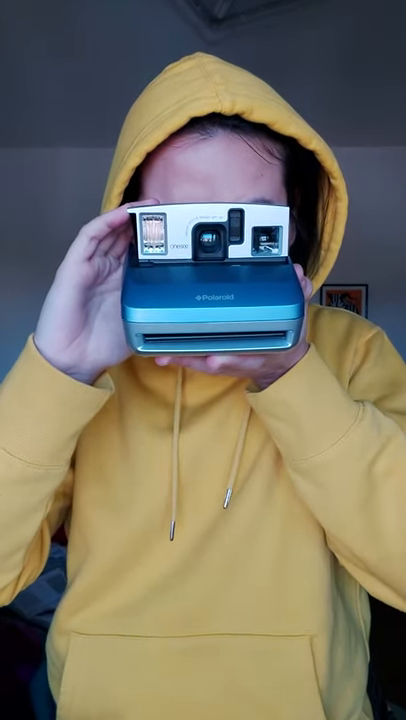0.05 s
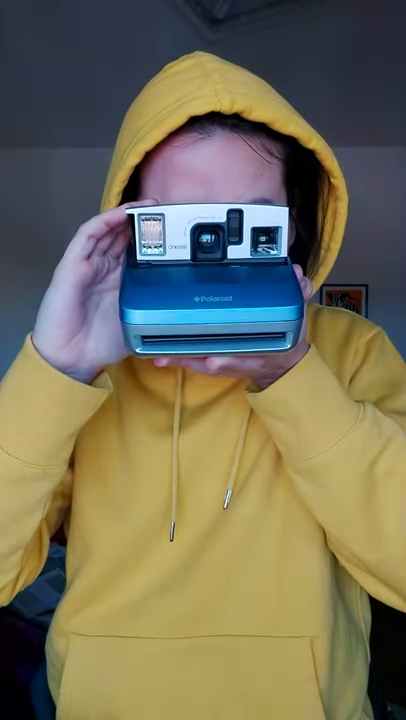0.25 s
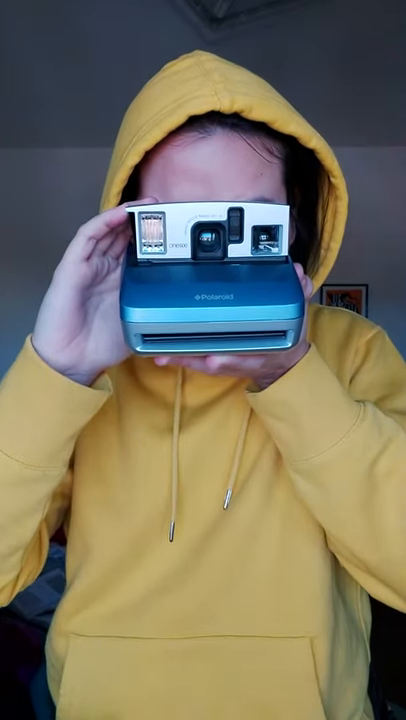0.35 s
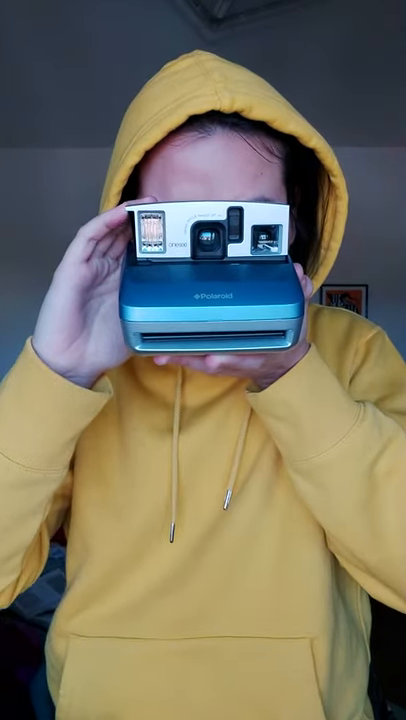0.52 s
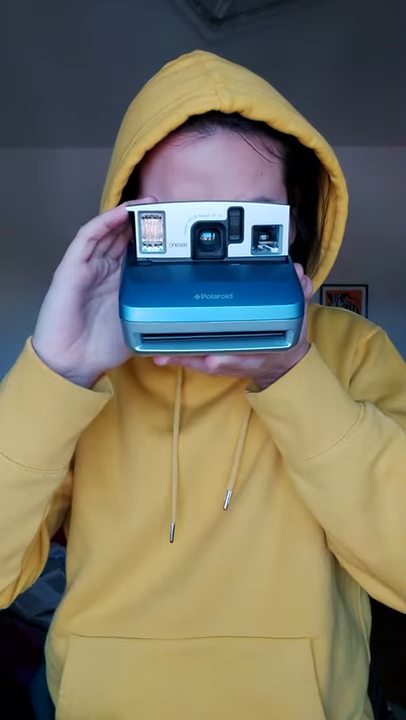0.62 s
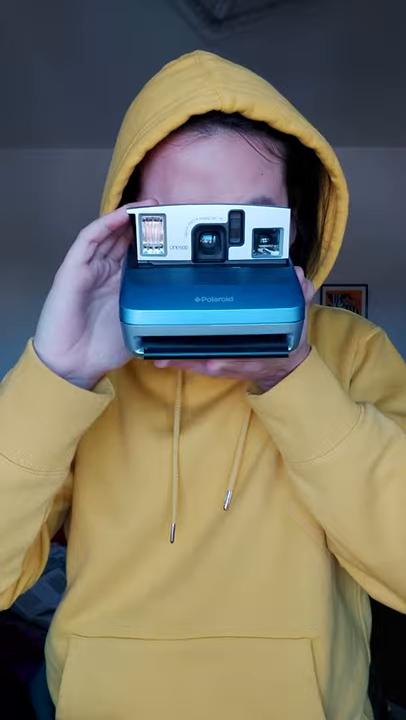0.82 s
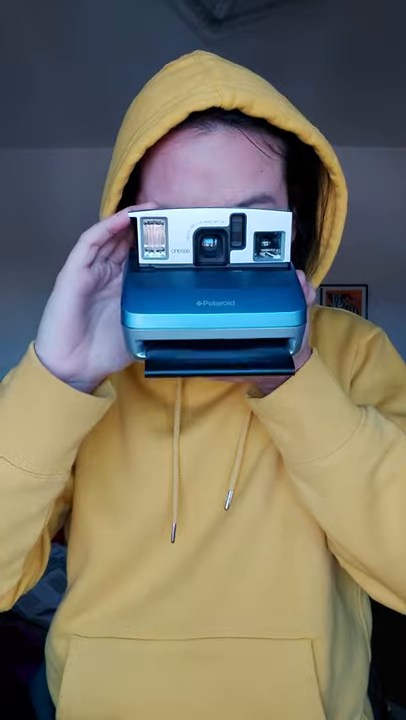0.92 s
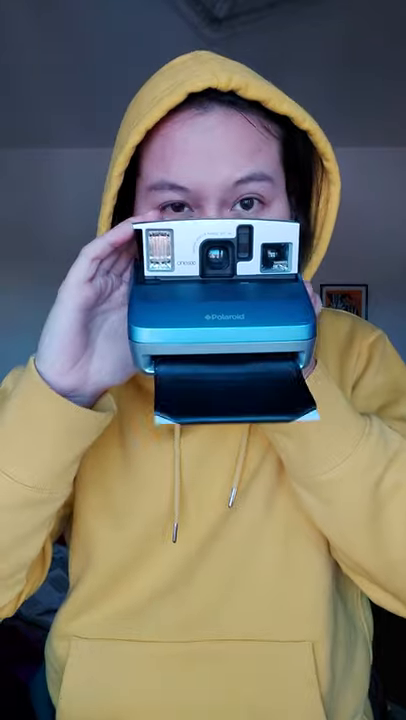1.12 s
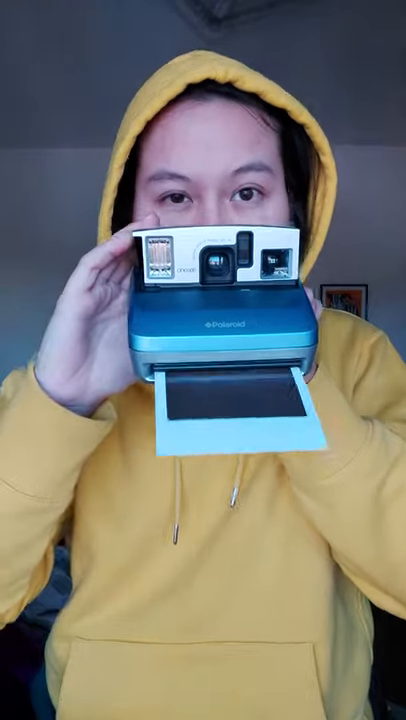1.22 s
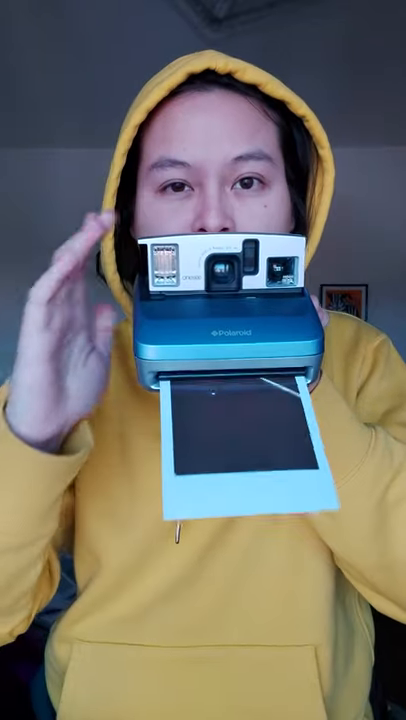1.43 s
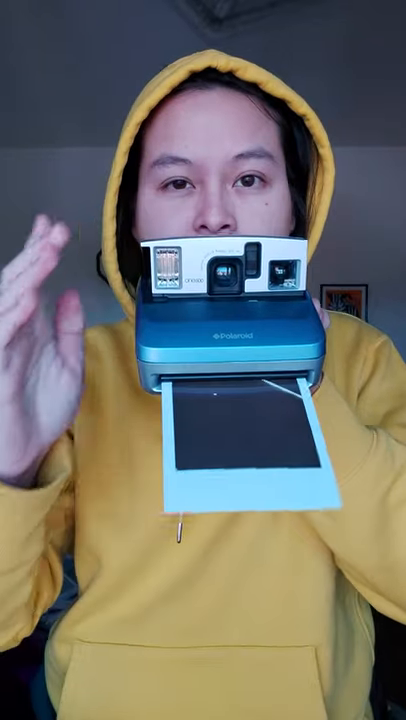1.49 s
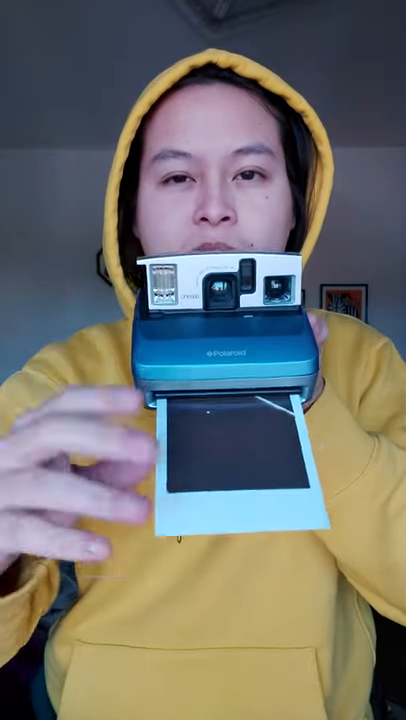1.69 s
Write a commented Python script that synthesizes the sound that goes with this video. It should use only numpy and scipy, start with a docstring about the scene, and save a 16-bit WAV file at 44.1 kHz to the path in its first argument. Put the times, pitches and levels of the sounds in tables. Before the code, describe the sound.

An instant camera clicks, then whirs and clacks as its motor pushes out a print.

```python
"""An instant camera takes a picture and pushes out the print in a small, quiet room.
First the button, shutter and mirror click. Then a small motor starts to whine and drives rattling
plastic gears. The rollers grip the print with a growl and hum as they squeeze it, slowing the motor.
Next levers clack, the light shield snaps back and rustles, and the freed print wobbles.
After a last clack the gears run down."""
import sys
import numpy as np
from scipy import signal
from scipy.fft import rfft, irfft
from scipy.io import wavfile

SR = 44100
rng = np.random.default_rng(int(sys.argv[2]) if len(sys.argv) > 2 else 0)


def to_wav(s):
    """Save 16-bit WAV."""
    ch = np.atleast_2d(s).T  # columns
    pcm = np.round(np.clip(ch, -1, 1) * 32767)  # PCM
    wavfile.write(sys.argv[1], SR, pcm.astype(np.int16))


N = 77175
TIME = np.arange(N) / SR
FFT_SIZE = 2 ** 17
HZ = np.maximum(np.arange(FFT_SIZE // 2 + 1) * SR / FFT_SIZE, 1)


def from_db(db):
    """Turn decibels into a number to multiply by."""
    return 10 ** (np.asarray(db) / 20)


def rms_one(x):
    """Scale to an average strength (rms) of 1."""
    return x / np.sqrt(np.mean(x ** 2) + 1e-20)


def in_time(rows):
    """Join a table's points in time: one curve for each column after the first."""
    times, *columns = np.transpose(rows)
    return [np.interp(TIME, times, column) for column in columns]


def per_hz(points):
    """Join a table's points to get a value at every frequency."""
    hz, value = np.transpose(points)
    return np.interp(np.log(HZ), np.log(hz), value)


def below(hz, order=8):
    """A soft edge: near 1 below this frequency, near 0 above it."""
    return 1 / (1 + (HZ / hz) ** order)


def shape(x, gain):
    """Turn each frequency up or down, with no ringing ahead of the sound (minimum phase)."""
    cepstrum = irfft(np.log(np.maximum(gain, 1e-6)))[:FFT_SIZE // 2]
    cepstrum[1:] *= 2
    return irfft(rfft(x, FFT_SIZE) * np.exp(rfft(cepstrum, FFT_SIZE)))[..., :N]


def drift(rate_hz):
    """A random wander of size about 1, mostly slower than the given rate."""
    return rms_one(irfft(rfft(rng.standard_normal(FFT_SIZE)) * below(rate_hz, order=2))[:N])


def grains(roughness, rate_hz):
    """Two streams of tiny, crowded taps of uneven size."""
    return rms_one(rng.standard_normal((2, N)) * np.exp(roughness * drift(rate_hz)))


def rough_tone(angle, roughness, flutter_hz=35):
    """A tone that flutters in loudness and pitch."""
    tone = (1 + roughness * drift(flutter_hz)) * np.sin(angle)
    jitter = roughness * drift(flutter_hz) * np.cos(angle)
    return np.sqrt(2) * (tone + jitter)


# How alike the two sides are: f/Hz, likeness (1 same, 0 unrelated, -1 opposite)
LIKENESS = [(60, -0.076), (290, 1), (640, 0.29), (1400, -0.21), (3100, -0.27), (7000, 0.46), (15000, -0.36)]

def spread(pair):
    """Mix two unrelated signals into left and right, most alike in the low notes."""
    alike = np.clip(per_hz(LIKENESS), -.95, .95)
    return shape(pair[0], np.sqrt(1 + alike)) + shape(pair[1], np.sqrt(1 - alike)) * [[1], [-1]]


# Colour (mix of lows and highs) of the room's noise: f/Hz, relative level/dB
ROOM_COLOUR = [(25, -7), (100, 5.5), (200, -1.5), (500, -8), (1200, -9.5), (3000, -14), (7500, -31),
               (12000, -17), (16000, -22)]

def room_noise(level_db=-75):
    """The room's faint, steady, low hush."""
    noise = spread(rng.standard_normal((2, N)))
    return from_db(level_db) * rms_one(shape(noise, from_db(per_hz(ROOM_COLOUR))))


def room_echo(x, level_db=-12, fade_s=0.24, delay_s=0.01):
    """Sound bounces around a small furnished room. Every fade time here is for a drop of 60 dB."""
    tail = rng.standard_normal((2, N)) * from_db(-60 * TIME / fade_s) * (TIME > delay_s)
    return from_db(level_db) * signal.fftconvolve(x, rms_one(tail) / np.sqrt(N), axes=1)[:, :N]


# Parts that ring after a blow (low ones: freed print, jolted body): t/s, f/Hz, level/dB, fade/s
RINGS = [(0.154, 363, -59, 0.56), (.192, 354, -46, 0.29), (.194, 1042, -31, 0.079), (0.264, 363, -32, 0.12),
         (.266, 1025, -30, .15), (1.1, 617.7, -21, 0.14), (1.1, 1405, -12.5, 0.039),
         (1.268, 89.8, -48, 0.34), (1.291, 121, -37.5, 0.32), (1.297, 371, -35, 0.13),
         (1.283, 1840, -28, 0.13), (1.304, 1920, -25, 0.14), (1.425, 85, -43.5, 0.13),
         (1.426, 693, -22.5, .1), (1.426, 1384, -22.5, 0.041), (1.435, 488, -35.5, 0.19)]

def ringing_parts(rise_cycles=1.23):
    """The print and plastic parts swing, building up over the first cycles and then dying away."""
    out = np.zeros(N)
    for start, hz, db, fade_s in RINGS:
        age = np.maximum(TIME - start, 0)
        rise = 1 - np.exp(-age * hz / rise_cycles)
        out += from_db(db - 60 * age / fade_s) * rise * np.sin(2 * np.pi * hz * age)
    return out


# Loudness of the shield's rustle: t/s, level/dB
SHIELD_LEVEL = [(1.281, -24), (1.287, -33), (1.299, -42), (1.307, -30), (1.316, -42), (1.328, -28.5),
                (1.34, -38), (1.365, -39), (1.39, -55), (1.42, -80)]
# Colour of the rustle: f/Hz, relative level/dB
SHIELD_COLOUR = [(200, -14), (1500, -15), (1900, 9.5), (2400, -9), (2900, 12.5), (3500, -10), (4300, 12),
                 (6000, -34), (8000, -34), (16000, -30)]

def light_shield():
    """The thin plastic shield crackles as it rolls up."""
    db, = in_time(SHIELD_LEVEL)
    crackle = grains(roughness=0.58, rate_hz=460) * from_db(db) * (TIME > SHIELD_LEVEL[0][0])
    return spread(shape(crackle, rms_one(from_db(per_hz(SHIELD_COLOUR)))))


# Tones in the rollers' hum: multiple of the lowest pitch, level/dB
ROLLER_HUM = [(1, -58), (2, -40), (3, -48.5), (6, -62)]

def rollers(pitch_hz=248.7, wobble=0.0038, roughness=0.34):
    """A hum swells as the print is squeezed through and stops at its edge."""
    start_s, full_s, edge_s, release_s = .78, .98, 1.056, 0.02
    angle = 2 * np.pi * np.cumsum(pitch_hz * (1 + wobble * drift(20))) / SR
    swell = np.interp(TIME, [start_s, full_s, edge_s, edge_s + release_s], [0, 1, 1, 0])
    hum = sum(from_db(db) * np.sqrt(2) * np.sin(multiple * angle) for multiple, db in ROLLER_HUM)
    return swell * (1 + roughness * drift(27)) * hum


# How fast the motor spins: t/s, turns per second/Hz
MOTOR_SPEED = [(.3, 250), (.44, 386), (.58, 406), (.675, 387), (.725, 342), (.78, 332), (.88, 326),
               (.98, 325), (1.05, 322), (1.13, 328), (1.25, 341), (1.42, 338), (1.75, 230)]

def motor_angle(wobble=0.00402):
    """How far the slightly unsteady motor has turned, in radians."""
    speed, = in_time(MOTOR_SPEED)
    return 2 * np.pi * np.cumsum(speed * (1 + wobble * drift(40.8))) / SR


def grip_growl(angle, start_s=0.632, rise_s=0.019, fade_s=0.28, level_db=-37):
    """The gears growl and fall in pitch as the rollers grip the print."""
    age = np.maximum(TIME - start_s, 0)
    multiples = (.9, 1.85, 2.3, 2.7, 3.62, 7.4)
    growl = sum(rough_tone(multiple * angle, roughness=0.55) for multiple in multiples)
    return from_db(level_db - 60 * age / fade_s) * (1 - np.exp(-age / rise_s)) * growl


# Tones of the motor and gears: multiple of the motor's speed, level/dB before the boost, roughness 0-1
WHINE_TONES = [(.53, -68.5, 0.12), (3, -49.5, 0.88), (4.65, -57, 0.4), (6, -51.5, 0.7), (9, -63.5, 1),
               (12, -56, .5), (19.5, -63.5, .3)]
# Boost of those tones, which grows as the motor works harder: t/s, level/dB
LOAD_BOOST = [(.3, -7), (.58, -9), (.67, 2), (.8, 4.5), (1.0, 2.5), (1.12, 6), (1.25, 8), (1.32, -0.5),
              (1.42, -6), (1.47, -9), (1.75, -28)]
# Singing of the teeth on the motor's own small gear: t/s, level/dB
TOOTH_LEVEL = [(.71, -68), (.77, -37), (.9, -41.5), (.99, -51.5), (1.08, -35.5), (1.14, -38), (1.25, -41.5),
               (1.36, -59), (1.41, -38), (1.445, -49.5), (1.75, -82)]

def motor_whine(angle, teeth=13):
    """The motor and its small gear sing at multiples of its speed, louder when it works hard."""
    boost_db, = in_time(LOAD_BOOST)
    tooth_db, = in_time(TOOTH_LEVEL)
    whine = sum(from_db(db) * rough_tone(multiple * angle, rough) for multiple, db, rough in WHINE_TONES)
    tooth_tone = rough_tone(teeth * angle, roughness=0.78)
    return (TIME > MOTOR_SPEED[0][0]) * (from_db(boost_db) * whine + from_db(tooth_db) * tooth_tone)


# Pitches at which the plastic shell rings: f/Hz, width/Hz, boost for gears/dB, boost for blows/dB
SHELL_NOTES = [(349.6, 80, 11.5, 10.5), (489.6, 33, 7.5, 7), (627, 89, 6.5, 7.5), (711, 59, 6.5, 5.5),
               (883, 47, 11, 7), (1073, 63, 7.5, 5), (1368.6, 46, 10.5, 11.5), (1590, 93, 9, 6.5),
               (2066, 28, -19, 10.5), (2350, 23, 9.5, -13), (2912, 84, 19, -22), (3490, 190, -1, 7),
               (4247, 430, 7, 9.5), (4947, 240, 7.5, -2)]

def shell(colour, struck):
    """The camera's shell adds its own peaks and dips to a sound's colour."""
    peaks_db = sum((blow_db if struck else gear_db) / (1 + (2 * (HZ - hz) / width) ** 2)
                   for hz, width, gear_db, blow_db in SHELL_NOTES)
    return rms_one(from_db(per_hz(colour) + peaks_db))


# Loudness of the rattle in three ranges: t/s, lower level/dB, upper level/dB, treble level/dB
RATTLE_LEVELS = [(0.188, -45, -65, -82), (.29, -52, -62, -78), (.33, -40.5, -45.5, -59),
                 (0.389, -38.5, -41, -45), (.58, -33.5, -37.5, -41), (.63, -34, -38, -41),
                 (0.658, -32.5, -37, -42.5), (.73, -33.5, -38, -45), (.85, -35.5, -40, -44.5),
                 (1.05, -36, -39, -44), (1.24, -35.5, -38.5, -44.5), (1.31, -37, -37.5, -51),
                 (1.41, -34.5, -38.5, -48.5), (1.47, -43, -48, -52.5), (1.52, -43, -46.5, -52.5),
                 (1.62, -49.5, -52.5, -57.5), (1.75, -56, -60, -67.5)]
# Colour of the rattle: f/Hz, relative level/dB
RATTLE_COLOUR = [(60, -26.5), (130, -17.5), (215, -15.5), (280, -16), (340, -3.5), (480, -5), (900, -2.5),
                 (1300, -2), (2200, 6), (3200, 6), (4500, -7.5), (5600, -7.5), (6700, -13), (7600, -25.5),
                 (9200, -23.5), (10500, -17), (13000, -12), (16000, -16.5)]

def gear_rattle(angle, throb=0.14, upper_hz=2864, treble_hz=7490):
    """Gear teeth rattle together, throbbing with each turn of the motor, and shake the shell."""
    taps = spread(grains(roughness=0.15, rate_hz=870) * (1 + throb * np.cos(angle)))
    body = shell(RATTLE_COLOUR, struck=False)
    lower, under_treble = below(upper_hz), below(treble_hz)
    bands = (lower, np.abs(under_treble - lower), 1 - under_treble)
    rattle = sum(from_db(db) * shape(taps, rms_one(body * band))
                 for db, band in zip(in_time(RATTLE_LEVELS), bands))
    return (TIME > RATTLE_LEVELS[0][0]) * rattle


# Plastic parts hitting each other: t/s, level/dB, fade/s, low knock boost/dB, treble boost/dB
CLACKS = [(0.1509, -36.5, 0.072, -10, -3), (0.1926, -32, 0.043, -1.5, -3), (0.1982, -25.5, .035, -6, 3.5),
          (0.2016, -33.5, 0.033, 6, -10), (0.264, -34.5, 0.027, 4.5, -15), (0.27, -30.5, 0.043, 7.5, -12),
          (0.299, -33, 0.045, 5.5, -2), (0.649, -35, 0.063, 11, -9), (1.0983, -14, 0.026, 2.5, -8),
          (1.1013, -17.5, 0.037, 2.5, -3), (1.108, -20, .05, -19, -6), (1.209, -43, .05, -14, -10),
          (1.215, -32, 0.031, 11.5, 7.5), (1.2705, -27, .025, -11, -4.5), (1.272, -11.5, .022, -11, -4.5),
          (1.2815, -11, 0.014, -17, -13), (1.397, -36, 0.037, 14.5, -6), (1.4251, -28.5, 0.041, 16, -0.5),
          (1.4278, -29.5, 0.05, 9, 3.5), (1.432, -29, .035, 3, -5), (1.453, -45, 0.024, 20, -2)]
# Colour of a clack: f/Hz, relative level/dB
CLACK_COLOUR = [(60, -38), (200, -20), (330, -9.5), (700, -4.5), (1400, 2.5), (2400, 2), (4200, -2),
                (5500, -7), (6800, -16), (8200, -26), (10500, -12), (13000, -9), (16000, -12)]

def clacks(knock_hz=1500, treble_hz=6940, tail_db=-19.5, tail_fade_s=0.25):
    """Each hit sets off a quickly dying chatter of loose parts that rings in the shell."""
    knock, under_treble = below(knock_hz, order=4), below(treble_hz)
    bands = (knock, (1 - knock) * under_treble, 1 - under_treble)
    band_powers = np.zeros((3, N))
    for start, db, fade_s, knock_db, treble_db in CLACKS:
        age = np.maximum(TIME - start, 0)
        hit = from_db(db - 60 * age / fade_s)
        tail = from_db(db + tail_db - 60 * age / tail_fade_s)
        boosts = from_db([[knock_db], [0], [treble_db]])
        band_powers += (TIME >= start) * boosts ** 2 * (hit ** 2 + tail ** 2)
    chatter = rng.choice([-1., 1.], (2, N))
    body = shell(CLACK_COLOUR, struck=True)
    out = np.zeros((2, N))
    for power, band in zip(band_powers, bands):
        bursts = rng.permutation(chatter, axis=1) * np.sqrt(power)  # shuffled anew for each range
        out += shape(bursts, body * np.sqrt(band))
    return spread(out)


# How much louder the camera is on the left than on the right: f/Hz, level/dB
BALANCE = [(100, 2), (160, -7.5), (270, -4.5), (450, 3.5), (1200, 2.5), (2000, 6), (3300, 9.5), (4400, 19),
           (5600, 15), (7500, 9.5), (9500, 0), (15000, 2.5)]

def scene(left_delay_s=0.00015):
    """The camera up close, its bright sounds mostly on the left, over the quiet room."""
    angle = motor_angle()
    drive = gear_rattle(angle) + motor_whine(angle) + grip_growl(angle) + rollers()
    camera = drive + clacks() + light_shield() + ringing_parts()
    left, right = camera + room_echo(camera)
    left = irfft(rfft(left, FFT_SIZE) * np.exp(-2j * np.pi * HZ * left_delay_s))[:N]
    lean_left = from_db(per_hz(BALANCE))
    right_gain = np.sqrt(2 / (1 + lean_left ** 2))  # keeps the total power the same
    return np.array([shape(left, lean_left * right_gain), shape(right, right_gain)]) + room_noise()


def record(dry, cutoff_hz=16100):
    """Cut away the very highest treble."""
    return irfft(rfft(dry, FFT_SIZE) * below(cutoff_hz, order=200))[:, :N]


dry = scene()
out = record(dry)
to_wav(out)
```